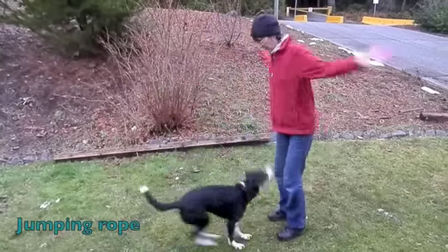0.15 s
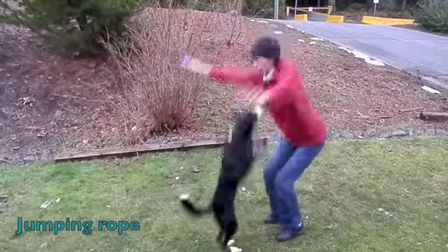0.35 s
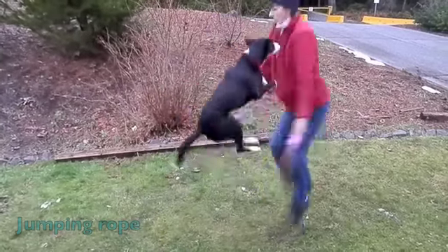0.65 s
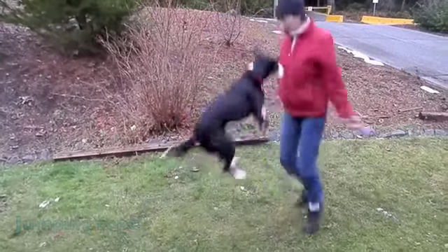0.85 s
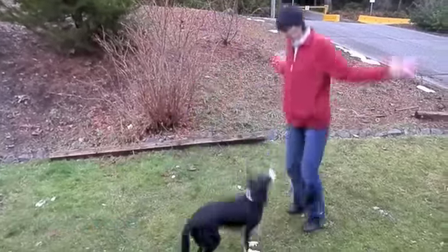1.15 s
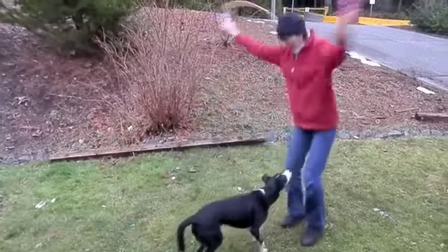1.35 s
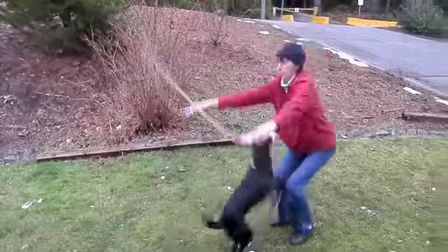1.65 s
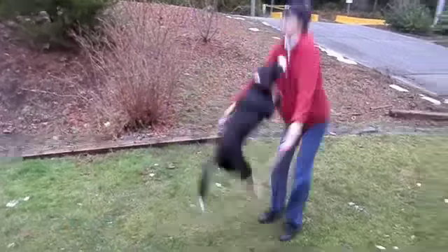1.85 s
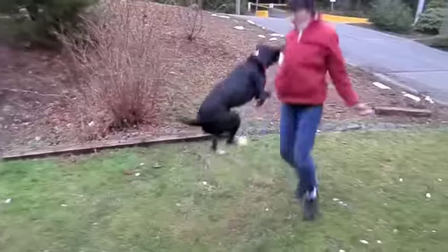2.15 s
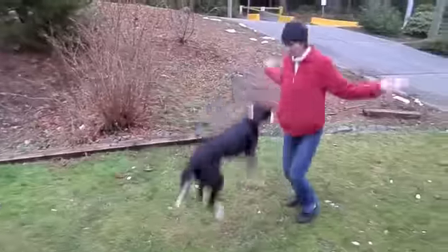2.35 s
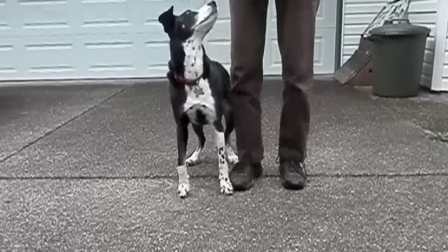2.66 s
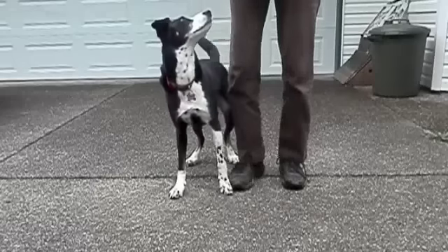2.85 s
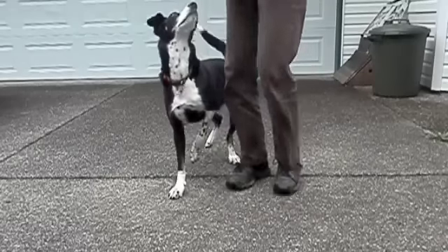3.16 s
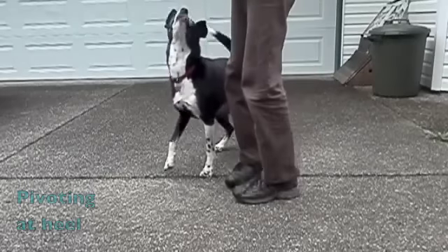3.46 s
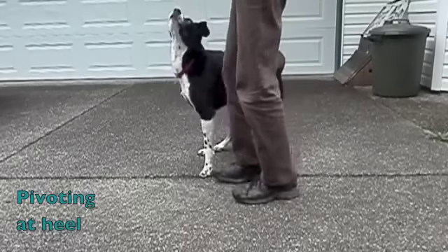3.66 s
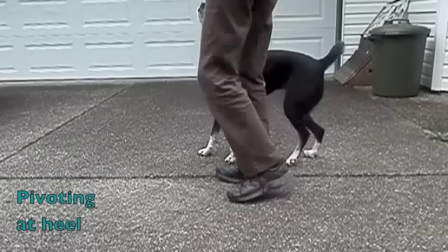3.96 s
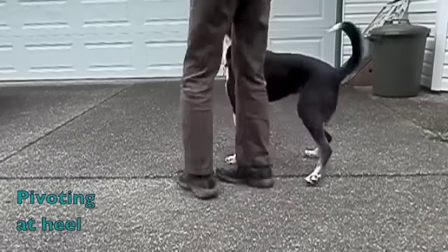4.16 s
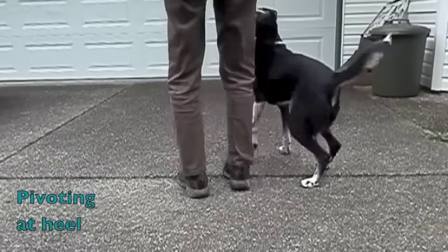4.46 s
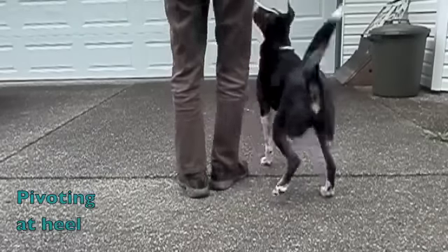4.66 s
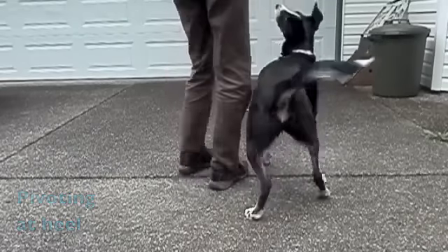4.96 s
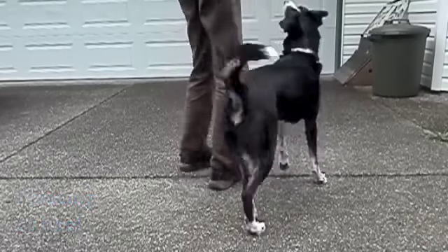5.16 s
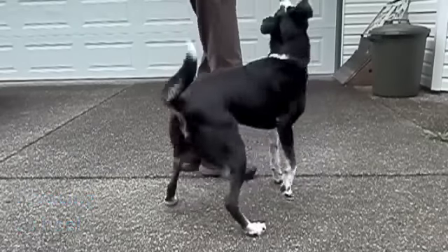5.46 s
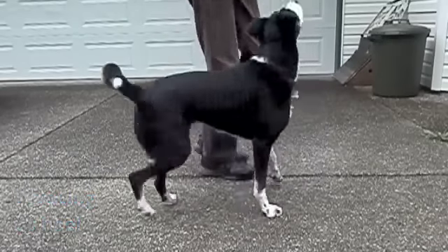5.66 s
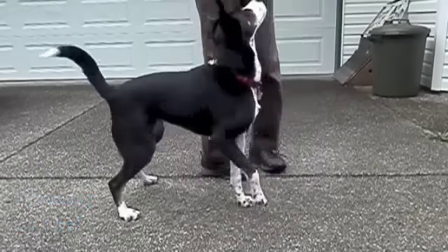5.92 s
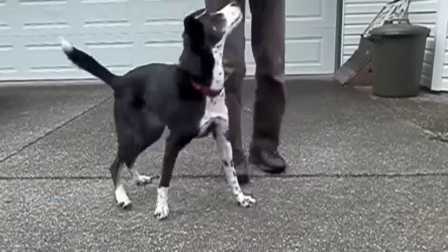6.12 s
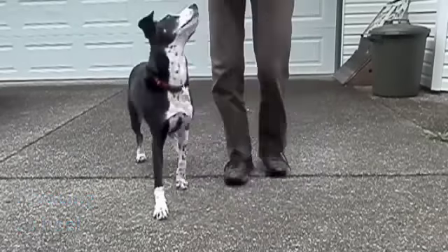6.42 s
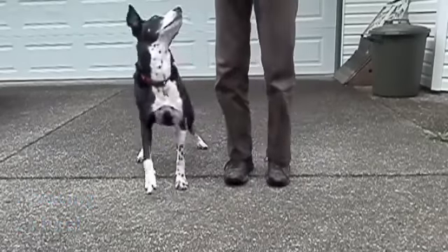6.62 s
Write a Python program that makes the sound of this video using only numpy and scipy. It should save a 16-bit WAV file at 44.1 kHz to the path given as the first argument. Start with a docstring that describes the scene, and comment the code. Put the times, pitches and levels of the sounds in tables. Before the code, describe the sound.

From 0 to 2.5 seconds, a lawn with a low, wavering rumble of distant traffic and faint hiss. A tiny tag jingle and jacket rustle open it; sound vanishes from about 0.3 to 0.6. Then rope ticks and slaps at 0.65-0.75, soft deep thuds of landings at 0.65-1.15, and a tinkle near 1.03. A bright jingle comes at 1.7, another silence at 1.75-1.95, then more ticks and the heaviest thuds near 2.2. It fades out by 2.57 into a concrete drive. Claws click lightly at 2.8, sharply at 3.3, 4.2, 4.9, 5.2, 5.5, 5.8, 6.1, 6.4 and 6.72, each with a short clattery echo off a garage door. Between them dull shoe knocks, gritty scrapes and fine paw rubbing. Low wind buffets thump the microphone from 3.9, strongest around 4.2-5.5 and again towards the end near 6.8.

```python
"""A dog and its handler jump rope on a lawn: low drum-like thuds of landing, a rustling jacket of tiny snaps,
collar tags ringing as dying tones, and rope ticks and slaps over filtered-noise traffic. It is muted twice.
After a fade the dog steps round the handler on a concrete drive: claws click in short bursts and echo off a
garage door, shoes knock and grit scrapes in shaped noise, and wind buffets the microphone with low lumps."""
import sys
import numpy as np
from scipy import signal
from scipy.fft import rfft, irfft, next_fast_len
from scipy.io import wavfile
from scipy.ndimage import uniform_filter1d

SR = 44100
rng = np.random.default_rng(int(sys.argv[2]) if len(sys.argv) > 2 else 0)


def output_pcm(signal):
    """Save a mono or channel-first signal as 16-bit PCM at the path in sys.argv[1].

    Samples are clipped to [-1, 1] before scaling.
    """
    pcm = np.clip(np.atleast_2d(signal).T, -1, 1) * 32767
    wavfile.write(sys.argv[1], SR, np.round(pcm).astype(np.int16))


N = 299432

# tone colour of fine bright rubbing, in the jacket and under the paws: f/Hz, level/dB
FINE_RUB = [(2500, -27), (4000, -27.5), (5000, -12), (6000, -2), (8500, 5), (10500, -6.5), (13000, -10),
            (15700, -0.5), (16000, -48.5)]
# pads and soles drag on concrete: t/s, length/ms, pad level/dB, sole level/dB
DRAGS = [(2.66, 100, -81, -100), (2.691, 18, -85, -90), (2.897, 126, -80, -71), (2.962, 7, -80, -81),
         (3.078, 78, -77, -75), (3.092, 9, -81, -93), (3.159, 60, -81, -81), (3.211, 94, -82, -78),
         (3.0, 190, -94, -92), (3.305, 39, -84, -66), (3.43, 82, -92, -81), (5.205, 57, -76, -81),
         (3.248, 69.0, -78, -107), (3.358, 210, -76, -87), (3.492, 30, -91, -86),
         (3.561, 150, -80.5, -76.5), (3.614, 45, -74, -100), (3.694, 59, -80, -74.5), (3.761, 23, -81, -76),
         (3.872, 130, -74.5, -76), (3.929, 52, -89, -75), (3.962, 94, -67.5, -89), (4.215, 53, -78, -68),
         (4.291, 190, -80, -75.5), (4.44, 44, -93, -80), (4.66, 380, -95, -84), (4.36, 36, -89, -75),
         (4.425, 14, -77, -88), (4.52, 110, -76.5, -76), (4.561, 110, -79, -76), (4.769, 52, -75, -69),
         (4.895, 30, -76, -78), (5.023, 130, -82, -85), (5.114, 96, -69.5, -82), (5.155, 220, -73, -70.5),
         (5.3, 67, -85, -79), (5.361, 57, -77.5, -74), (5.43, 110, -84, -84), (5.6, 470, -86, -84),
         (5.672, 25, -82, -84), (5.701, 50, -68.5, -71), (5.781, 85, -75.5, -76), (5.9, 260, -78, -79.5),
         (6.068, 30, -77, -88), (6.181, 70, -78, -78.5), (6.286, 500, -80.5, -82), (6.528, 87, -74, -74),
         (6.578, 79, -78, -80), (6.782, 40, -74, -80)]


def amp(db):
    """Turns decibels into a gain."""
    return 10 ** (np.asarray(db) / 20)


def evened(x):
    """Scales a signal to an average strength (rms) of 1."""
    return x / np.sqrt(np.mean(x ** 2) + 1e-20)


def add(mix, s, sound):
    """Mixes a sound in, starting at s seconds."""
    part = mix[round(s * SR):][:len(sound)]
    part += sound[:len(part)]


def curve(rows):
    """Reads a table of t/s, value at every sample, with straight lines between the points."""
    return np.interp(np.arange(N) / SR, *np.transpose(rows))


def wander(seconds):
    """Makes a slow random curve of rms 1 by smoothing noise twice."""
    size = max(round(seconds * SR), 2)
    smooth = uniform_filter1d(rng.standard_normal(N), size)
    return evened(uniform_filter1d(smooth, size))


def coloured(x, shape):
    """Filters x to a tone colour given as f/Hz, level/dB points; the result has rms 1."""
    size = next_fast_len(N)
    hz, db = np.transpose(shape)
    log_hz = np.log(np.fft.rfftfreq(size, 1 / SR) + 1)
    gain = amp(np.interp(log_hz, np.log(hz + 1), db))
    return evened(irfft(rfft(x, size) * gain, size)[:N])


def ring(modes, seconds):
    """Adds dying sine tones, each given as f/Hz, level/dB, time to fall by 60 dB/s."""
    t = np.arange(round(seconds * SR)) / SR
    return sum(amp(db - 60 * t / t60) * np.sin(2 * np.pi * hz * t) for hz, db, t60 in modes)


def grains(shape, per_s, spread_db):
    """Makes the sound of rubbing: dense tiny snaps of uneven size over a little hiss."""
    hit = rng.random(N) < per_s / SR
    size = amp(spread_db * np.minimum(rng.exponential(1, N), 4)) * hit
    return coloured((evened(size) + 1.1) * rng.standard_normal(N), shape)


def swells(rows, rest_db):
    """Makes a level curve from t/s, length/ms, level/dB rows that swell and fade over a resting level."""
    rise, fall = 0.23, 0.38  # shares of the length: quicker in than out
    lead = SR // 8  # each swell begins this many samples before its time
    out = np.full(N, amp(rest_db))
    for s, ms, db in rows:
        u = np.arange(-lead, SR // 4) / SR / (ms / 1000)
        add(out, s, amp(db) * np.exp(-(u / np.where(u < 0, rise, fall)) ** 2))
    return np.append(out[lead:], np.full(lead, amp(rest_db)))  # shift back by the lead


def burst(modes):
    """Makes a few cycles of each broad f/Hz, width/Hz, level/dB band in a bell shape centred on sample 60."""
    t = np.arange(-60, 140) / SR
    return sum(amp(db) * np.exp(-(2 * width * t) ** 2) * np.sin(2 * np.pi * hz * t + 1)
               for hz, width, db in modes)


def clicks(rows, grit_db, grit_s, swell_in_db):
    """A click: faint noise swells briefly, a sharp peak, then clumpy noise dies fast, in three tone parts."""
    # sharp part: factor on the click's pitch, width/Hz, level/dB
    bright = [(0.718, 2500, -17), (1.03, 2560, 2), (1.3, 3000, -48)]
    # dull part: f/Hz, width/Hz, level/dB
    dull = [(2500, 2200, -12), (3830, 2370, -5.5)]
    # thin top, one row: f/Hz, width/Hz, level/dB
    top_hz, top_width, top_level_db = (13260, 2700, 4.5)
    crisp = 0.96  # share of the peak kept per dB of weakness
    width_spread_db = 1.1  # the sharp part differs in width from click to click
    dull_shift, dull_mix_db = 0.12, -0.5  # the dull part differs in pitch (share) and level

    out, t = np.zeros(N), np.arange(-300, 500) / SR
    swell_in = amp(swell_in_db) * np.exp(t / 0.0047) * (1 - t / t[0])
    fade = amp(grit_db) * np.exp(-abs(t) / grit_s)
    shape = np.where(t < 0, swell_in, fade)
    clumps = amp(3.7 * np.repeat(rng.standard_normal((len(rows), 40)), repeats=20, axis=1))
    pulses = rng.laplace(size=(len(rows), 800)) * clumps * shape
    # the sharp peak: weak clicks have more noise and less peak
    pulses[:, 300] = crisp ** (np.max(rows, 0)[1] - np.asarray(rows)[:, 1])
    pulses /= np.linalg.norm(pulses, axis=1, keepdims=True)

    odds = rng.standard_normal((len(rows), len(dull) + len(bright), 2))  # makes each click differ
    for (s, db, pitch, dull_db, top_db), pulse, odd in zip(rows, pulses, odds):
        modes = []
        for (factor, width, level), (a, _) in zip(bright, odd[len(dull):]):
            modes.append((factor * pitch, width * amp(width_spread_db * a), level))
        for (hz, width, level), (a, b) in zip(dull, odd):
            modes.append((hz * (1 + dull_shift * a), width, level + dull_db + dull_mix_db * b))
        modes.append((top_hz, top_width, top_level_db + top_db))
        # the peak lies 300 samples into the pulse, the burst's centre 60 further
        add(out, s - 360 / SR, amp(db) * np.convolve(pulse, burst(modes)))
    return out


def cracks(rows):
    """A handful of uneven snaps dies fast, heard through one broad resonance."""
    out, t = np.zeros(N), np.arange(3000) / SR
    sizes = amp(5.7 * rng.standard_normal((len(rows), 3000)))
    snaps = rng.standard_normal((len(rows), 3000)) * sizes
    for (s, db, hz, ms), snap in zip(rows, snaps):
        band = signal.butter(2, [hz * 0.78, hz * 1.19], "bandpass", fs=SR, output="sos")
        fade = amp(-60000 * t / ms) * (1 - np.exp(-t / 0.0003))
        crack = signal.sosfilt(band, snap * fade)
        add(out, s, amp(db) * crack / abs(crack).max())
    return out


def traffic():
    """Distant road rumble is fluttering filtered noise, with hums whose pitch and level waver."""
    # tone colour of the rumble: f/Hz, level per Hz/dB
    rumble = [(12, -53.5), (20, -6), (37, -20.5), (75, 0), (130, -6), (184, -11), (351, -12), (452, -17.5),
              (735, -16), (1280, -33.5), (1370, -32.5), (2440, -43.5), (3400, -57.5), (5000, -74.5),
              (6500, -99), (11000, -120)]
    # wavering hums: f/Hz, pitch waver/Hz, level/dB
    hums = [(81.4, 14.04, -44), (122.3, 5.15, -45.5)]
    waver_s, flutter_db = 0.0392, 2
    road = coloured(rng.standard_normal(N), rumble) * amp(-40 + 1.5 * wander(0.03))
    for hz, width, db in hums:
        turns = np.cumsum(hz + width * wander(waver_s)) / SR
        road += amp(db + flutter_db * wander(waver_s)) * evened(np.sin(2 * np.pi * turns))
    return road


def hiss(db):
    """Thin hiss of air and microphone is noise that drifts in patches of pitch and time."""
    # tone colour: f/Hz, level/dB
    thin_air = [(5000, -34), (7000, -17), (9000, -17), (11500, -30), (13300, 8), (14500, 13), (15800, 14),
                (16000, -47)]
    patch_db = 2.5  # depth of the patches
    z = signal.stft(coloured(rng.standard_normal(N), thin_air), nperseg=512)[2]
    patches = uniform_filter1d(rng.standard_normal(z.shape), size=8, axis=0)
    patches = evened(uniform_filter1d(patches, size=10, axis=1))
    return amp(db) * evened(signal.istft(z * amp(patch_db * patches), nperseg=512)[1][:N])


def thuds():
    """Turf gives like a soft drum under feet and paws: three short low modes and a puff of crushed grass."""
    # landings: t/s, level/dB, pitch f/Hz, base time to fall by 60 dB/s, grass level against the thud/dB
    landings = [(0.059, -43, 133.6, 0.062, -28), (0.651, -19, 160, 0.069, -31),
                (0.862, -19, 150, 0.025, -33), (0.883, -21.5, 162.3, 0.1, -26),
                (0.954, -20.5, 131, 0.043, -26), (1.115, -20.5, 308, 0.06, -26),
                (1.124, -25.5, 160.5, 0.14, -36), (1.1374, -19, 122, 0.043, -29),
                (1.577, -21, 148, 0.057, -36), (1.961, -22, 142, 0.075, -27.5),
                (2.18, -15, 164, 0.076, -43), (2.1835, -16, 147, 0.02, -33), (2.234, -32.5, 134, 0.19, -28),
                (2.465, -25.5, 172.5, 0.12, -24), (2.51, -25.5, 79, 0.18, -44)]
    out, t = np.zeros(N), np.arange(round(.15 * SR)) / SR
    for s, db, hz, t60, grass_db in landings:
        modes = [(hz, db, t60), (hz * 1.7, db - 12.0, t60 * 1.4), (hz * 2.64, db - 12.5, t60 * 0.67)]
        body = ring(modes, .15)
        soft_noise = signal.lfilter([.1], [1, -.9], rng.standard_normal(len(t)))
        puff = soft_noise * amp(db + grass_db - 40 * t / t60)
        add(out, s, (body + puff) * (1 - np.exp(-t / 0.0022)))
    return out


def tags():
    """Two thin metal tags ring at every touch in another mix of modes, wavering in pitch as they swing."""
    # ringing modes, three of the larger tag, three of the smaller, two at the top:
    # f/Hz, level/dB, time to fall by 60 dB/s before the touch's ring factor
    tag_modes = [(6230, 1.5, 0.11), (7080, 1.5, 0.033), (7960, 5, 0.13), (9225, 0, 0.16), (9300, -7, 0.12),
                 (11260, -23, 0.34), (14300, -18, .06), (15650, -18.5, .06)]
    # touches: t/s, level/dB, the larger tag's three modes against the smaller/dB (three columns),
    # top modes/dB, ring time factor (fur damps them), rise time/ms
    touches = [(.063, -55.5, -18, -15, -19.5, 15.5, 0.7, .7), (.792, -61, -15, -6, -25, 7, 5.4, 6),
               (.925, -71, -1, -20, -1, 0, 1, 5), (1.034, -45, -29.5, -34, -32, 9.5, 1.1, 2),
               (1.145, -65, -9.5, -25, -18, 0, 1.4, 3), (1.19, -64.5, -15, -2, -20, -2, 0.57, 0.91),
               (1.335, -66, -11, -1, -12, -8, 4.9, 16), (1.385, -70, -18.5, 9.5, 1.5, -4, 1.15, 3),
               (1.435, -81, -6, -14, 7.5, 2.5, 1.7, 5), (1.699, -39.5, -10.5, -14.5, -18.5, 16, 0.14, 0.6),
               (1.738, -60.5, -4, -6, -3.5, 19, .4, 2), (2.116, -73.5, 11, -12, 5, 7, 0.38, .7),
               (2.494, -61, -11, -45.5, -24, -8, 0.94, .7), (5.111, -59, -9, 6, -11, 0, 0.88, 1)]
    out, t = np.zeros(N), np.arange(round(.3 * SR)) / SR
    sway, flutter = wander(0.0089), wander(0.011)
    # every mode reads the random curves from its own place
    place = rng.integers(0, N - len(t), (len(touches), len(tag_modes)))
    for (s, db, *large_db, top_db, free, ms), starts in zip(touches, place):
        stopped = amp(db - 30 * np.minimum(t / 0.18, 2) ** 2.5)  # fur stops the ring
        caught = stopped * (1 - np.exp(-1000 * t / ms))
        mix = large_db + [0, 0, 0, top_db, top_db]
        for (hz, level, t60), mix_db, k in zip(tag_modes, mix, starts):
            here = slice(k, k + len(t))
            turns = np.cumsum(hz * (1 + 0.0039 * sway[here])) / SR
            fade = amp(level + mix_db - 60 * t / (t60 * free) + 2.2 * flutter[here])
            add(out, s, caught * fade * np.sin(2 * np.pi * turns))
    return out


def jacket():
    """Cloth rustles at each swing of the arms: fine bright snaps and a duller brush of the sleeves."""
    # swings: t/s, length/ms, level/dB
    swings = [(.064, 37, -79.5), (.11, 110, -82.5), (.3, 330, -75), (.68, 107, -69), (.679, 23, -63.5),
              (.704, 20, -78), (.724, 22, -75), (.88, 320, -74.5), (.99, 56, -84), (1.03, 320, -79),
              (1.152, 100, -73.5), (1.32, 70, -85), (1.47, 190, -80), (1.6, 32, -85), (1.706, 94, -66.5),
              (1.955, 74, -67), (2.027, 78, -71.5), (2.117, 63, -76), (2.06, 100, -86), (2.185, 87, -75),
              (2.258, 69, -79), (2.48, 140, -74.5)]
    # tone colour of the sleeves: f/Hz, level/dB
    sleeves = [(2000, -4.5), (3500, 4.5), (5500, -12.5), (7500, -17.5)]
    level = swells(swings, -87.0) * amp(0.71 * wander(0.014))
    cloth = grains(FINE_RUB, 1100, 3.2)
    brush = amp(-8) * grains(sleeves, 900, 3)
    return level * (cloth + brush)


def rope_slaps():
    """The rope slaps turf or cloth in short cracks of noise."""
    # slaps: t/s, level/dB, centre f/Hz, time to fall by 60 dB/ms
    slaps = [(.6484, -59, 2600, 25), (.704, -52, 3500, 14), (.7228, -52, 3780, 28), (.828, -69, 9000, 15),
             (1.006, -53, 2600, 16), (1.113, -47.5, 1490, 66), (1.12, -58, 2980, 40), (1.46, -63, 7200, 12),
             (1.527, -63.5, 7200, 15), (2.168, -62, 8600, 10), (2.2418, -57, 2700, 28),
             (2.259, -62, 10000, 22), (2.464, -68, 3000, 25)]
    return cracks(slaps)


def rope_ticks():
    """Rope and jacket tick in tiny bright clicks."""
    # ticks: t/s, level/dB, pitch f/Hz, dull part against the click/dB
    small_hits = [(.65, -58, 8700, -6), (.66, -66, 7700, -4), (.667, -62, 9500, -20),
                  (0.6775, -54, 6800, -12), (.681, -46, 9400, -8), (0.7228, -66, 7300, 4),
                  (0.7277, -48.5, 8400, -10), (0.9943, -42, 8800, -22), (1.113, -49.5, 9050, -12),
                  (1.1454, -55.5, 7600, -8), (1.956, -49, 9050, -16), (1.9784, -59, 8840, 2),
                  (2.024, -49, 8400, -5), (2.024, -46, 8550, -23), (2.029, -44.5, 8460, -7),
                  (2.1174, -62, 7000, -9), (2.192, -49.5, 8800, -22)]
    ticks = [(*row, -9.5) for row in small_hits]  # adds the thin top's level in dB
    return clicks(ticks, -19.0, 0.0027, -35)


def lawn():
    """Mixes the sounds of the lawn except the tags."""
    return traffic() + hiss(-81.0) + thuds() + jacket() + rope_slaps() + rope_ticks()


def far_traffic():
    """Far traffic at the drive is low filtered noise with a fluttering level."""
    # tone colour: f/Hz, level per Hz/dB
    rumble = [(12, -40), (20, -21.5), (118, -4.5), (278, -10), (367, -15), (520, -18.5), (750, -20.5),
              (960, -24), (1150, -33.5), (1890, -47), (2600, -57), (3500, -86), (5000, -81), (8000, -120)]
    return amp(-50.5 + 1.8 * wander(0.022)) * coloured(rng.standard_normal(N), rumble)


def wind():
    """Wind on the microphone is lumpy low noise, plus single pressure dips with a swell on either side."""
    # level of the lumpy noise: t/s, level/dB
    strength = [(2.7, -55.5), (3.7, -52.5), (3.9, -52.5), (4.2, -44.5), (4.5, -48), (4.8, -44), (5.07, -52),
                (5.25, -40.5), (5.5, -41.5), (5.75, -49), (5.95, -43), (6.15, -47), (6.35, -53), (6.5, -44),
                (6.65, -47), (6.79, -36.5)]
    # tone colour: f/Hz, level per Hz/dB
    low_noise = [(8, 1.5), (25, 1), (60, 0.5), (120, -9), (250, -31), (500, -75.5)]
    # strongest buffets: t/s, peak level/dB, width/ms
    buffets = [(3.892, -29, 4.2), (3.919, -34.5, 5.8), (4.211, -27.5, 6.5), (4.237, -32, 3.34),
               (4.271, -32, 5.3), (4.451, -28.5, 6.8), (4.499, -37.5, 10), (4.642, -28.5, 7.6),
               (4.732, -33, 6.9), (4.837, -27, 6.3), (4.876, -35.5, 5.3), (4.89, -33.5, 6.2),
               (4.957, -34.5, 4.7), (4.984, -33, 6.3), (5.009, -29, 4.3), (5.083, -34, 13),
               (5.109, -28, 4.7), (5.159, -30.5, 5.2), (5.177, -34, 4.9), (5.299, -25.5, 3.06),
               (5.377, -36, 3.5), (5.447, -31.5, 6.6), (5.464, -45, 2.6), (5.541, -27, 4.4),
               (5.603, -36.5, 19), (5.926, -31.5, 7.6), (5.963, -62, 20), (6.561, -32.5, 8.7),
               (6.652, -34.5, 3.6), (6.721, -24.5, 7), (6.784, -36, 7.7)]
    lumpy = coloured(rng.standard_normal(N) * amp(2.1 * wander(0.039)), low_noise)
    out = amp(curve(strength)) * lumpy
    for s, db, ms in buffets:
        u = np.arange(-2200, 2200) / SR / (ms / 1000) * 1.2
        add(out, s - 2200 / SR, amp(db) * (u ** 2 - 1) * np.exp(-u ** 2 / 2))
    return out


def scuffs():
    """Each drag swells and fades: fine bright grit under the pads, coarser dull grit under the soles."""
    # tone colour of the soles: f/Hz, level/dB
    sole_rub = [(700, 5), (1500, -4), (2500, -1), (4000, -4.5), (6000, -22)]
    pads = swells([(s, ms, db) for s, ms, db, _ in DRAGS], -106)
    soles = swells([(s, ms, db) for s, ms, _, db in DRAGS], -97)
    flutter = amp(2.2 * wander(0.0099))
    return flutter * (pads * grains(FINE_RUB, 2200, 2.8) + soles * grains(sole_rub, 700, 3.5))


def snags(s, ms, db, dull_db):
    """A claw catches twice in each drag, as it starts and anywhere along it; gives rows for clicks."""
    s, ms, db, dull_db = (np.repeat(c, repeats=2) for c in (s, ms, db, dull_db))
    when = rng.random(len(s))
    when[::2] = 0
    size, tone = rng.standard_normal((len(s), 2)).T
    start = s + 0.74 * when * ms / 1000
    level = db + 8 + 4 * size  # dB, usually louder than the drag
    pitch = 7600 * (1 + 0.056 * tone)  # Hz
    return np.transpose([start, level, pitch, dull_db, np.full(len(s), -27)])  # thin top at -27 dB


def claws():
    """Claws click on concrete, with small ticks in the drags, duller where the sole drags harder."""
    # clear clicks, with a few bumps of their echo:
    # t/s, level/dB, pitch f/Hz, dull part against the click/dB, thin top against the click/dB
    clear_clicks = [(2.6636, -59, 7850, -12, -31), (2.691, -50.5, 7900, -6, -26),
                    (2.788, -43, 7650, -8, -6), (2.796, -41, 7900, -7, -15), (2.826, -61, 7000, 7, -25),
                    (2.893, -61, 8600, -10, -25), (2.9034, -71, 6020, 24, -22),
                    (3.2093, -46, 7460, -28, -33), (3.227, -54, 7950, -25, -23),
                    (3.2517, -54, 7900, -30, -27), (3.2967, -33.5, 7300, -4.5, -15),
                    (3.3035, -53, 7700, -6, -19), (3.367, -56, 8060, -22, -23), (3.426, -62, 8240, -8, -25),
                    (3.493, -61, 8550, -13, -25), (3.5986, -48, 6560, -38, -14),
                    (3.6105, -49.5, 6150, -27, -25), (3.627, -65, 8450, -20, -25),
                    (3.693, -59, 7900, 1, -22), (3.712, -50, 7900, -4, -35), (3.761, -63, 8550, -25, -25),
                    (3.857, -57, 7300, -20, -25), (3.892, -67, 8500, -6, -22),
                    (3.9518, -41, 7040, -4.5, -25), (3.959, -45, 7200, -17, -24),
                    (3.963, -45, 7600, -21, -22), (4.0039, -53, 7600, -30, -22),
                    (4.018, -67, 8100, -22, -25), (4.2139, -34.5, 6900, -10.5, -13),
                    (4.2255, -41.5, 8200, -13, -8), (4.227, -56, 7060, -17, -15),
                    (4.2341, -47, 7500, -15, -29), (4.557, -50.5, 7800, 6, -22),
                    (4.5612, -54, 8100, -20, -23), (4.5925, -41, 7200, -12, -16),
                    (4.9123, -30, 7900, -5, -16), (4.9146, -34.5, 7600, -4, -15),
                    (5.1905, -61, 6200, 22.5, -17), (5.1991, -34.5, 7460, -1, -14),
                    (5.2128, -46, 6600, -19, -25), (5.219, -43, 7600, -25, -21),
                    (5.222, -43, 7900, -7, -23), (5.2834, -46.5, 8000, -21, -11),
                    (5.462, -55, 8200, -17, -30), (5.473, -62, 7500, -15, -30),
                    (5.489, -37, 7660, -7.5, -15), (5.4908, -33.5, 7500, -3.5, -16),
                    (5.5595, -49, 8100, -4, -18), (5.7022, -51.5, 8350, -7, -2),
                    (5.7936, -45.5, 6400, 4.5, -12), (5.878, -64, 7500, -20, -25),
                    (5.8045, -38.5, 7960, -6.5, -14), (6.0872, -35.5, 7350, -6, -16),
                    (6.09, -54, 7400, -18, -17), (6.4142, -31, 7450, -8, -24), (6.4148, -51, 7000, -30, -3),
                    (6.429, -44, 7400, -23, -6), (6.721, -41, 7650, -9, -16), (6.7221, -32.5, 7800, -7, -6),
                    (6.725, -31, 7700, -16, -13), (6.7255, -52, 7900, -34, -10),
                    (6.7296, -41, 8100, -7, -9), (6.7655, -56, 7600, 11, -19)]
    s, ms, pads_db, soles_db = np.transpose(DRAGS)
    dull_db = np.clip(0.67 * (soles_db - pads_db) - 17.0, -25, 8)
    small = snags(s, ms, np.minimum(pads_db, -76), dull_db)
    return clicks(np.vstack([clear_clicks, small]), -25.5, 0.002, -40.0)


def door(x):
    """A ribbed door and wall scatter a late, swelling, quickly gone echo that changes as the dog moves."""
    # tone colour of the echo: f/Hz, level/dB
    door_tone = [(1200, 10), (2500, 5.5), (4500, 2.5), (6000, 7), (8000, 1), (10500, 9), (14000, 2),
                 (16500, 3)]
    late = np.maximum(np.arange(N) / SR - .007, 0)  # seconds since the first echo
    swell = (1 - 0.53 * np.exp(-(late / 0.011) ** 2)) * (1 - np.exp(-late / 0.0017))
    main_tail = amp(-60 * np.minimum(late / 0.073, 4))
    yard_tail = amp(-19.5 - 60 * np.minimum(late / 0.25, 4))  # fainter, longer tail from the yard
    shape = swell * (main_tail + yard_tail)
    # five random echoes take turns, 6000 samples each
    place, out = (np.arange(N) // 6000) % 5, np.zeros(N)
    for k in range(5):
        clumps = amp(1.6 * rng.standard_normal(N) + 2.8 * wander(0.00066))
        taps = coloured(rng.standard_normal(N) * clumps, door_tone) * shape
        out += signal.oaconvolve(x * (place == k), taps[:SR // 4] / np.linalg.norm(taps))[:N]
    return out


def grit_cracks():
    """Grit cracks under a sole or pad in short bursts of snaps."""
    # cracks: t/s, level/dB, centre f/Hz, time to fall by 60 dB/ms
    crunches = [(2.896, -53.5, 2620, 14), (2.9601, -73, 1290, 20), (2.962, -62, 3300, 14),
                (3.078, -67, 2600, 60), (3.1582, -63, 1490, 18), (3.159, -66, 4030, 13),
                (3.312, -54, 1980, 40), (3.324, -51.5, 1410, 47), (3.328, -55, 3000, 37),
                (3.4256, -59, 1270, 19), (3.427, -63.5, 4200, 21), (3.56, -67, 3830, 22),
                (3.6925, -79, 2500, 19), (3.762, -78, 3500, 22), (3.825, -67, 3570, 20),
                (3.892, -70, 3000, 20), (3.8381, -67, 1800, 16), (3.855, -73, 2600, 20),
                (4.2951, -79, 4000, 20), (4.3545, -49.5, 1840, 9.4), (4.4268, -64, 4400, 15),
                (4.5555, -62, 3270, 20), (4.7625, -59, 3660, 20), (4.79, -68, 3000, 20),
                (4.824, -71, 3950, 54), (5.026, -65, 3080, 18), (5.117, -63, 2700, 30),
                (5.138, -62, 2600, 30), (5.1606, -57, 1700, 30), (5.177, -63, 3500, 15),
                (5.292, -64, 4000, 15), (5.3617, -68, 3500, 27), (5.675, -66, 3000, 20),
                (5.7717, -65, 2800, 20), (5.9927, -53, 1200, 25), (6.0047, -55, 2120, 14),
                (6.012, -63, 1150, 70), (6.098, -67, 3600, 20), (6.183, -63.5, 2400, 26),
                (6.2556, -76, 2000, 20), (6.434, -60, 2300, 30), (6.5215, -57, 3650, 67)]
    return cracks(crunches)


def shoes():
    """Shoes on concrete have no clear ring: broad noise rises as the sole rolls down, then dies fast."""
    # steps: t/s, peak level/dB, centre f/Hz, time to fall by 60 dB/s
    steps = [(2.959, -33.5, 604, 0.04), (3.089, -43, 574, 0.035), (3.299, -35.5, 358, 0.49),
             (3.423, -47, 400, 0.19), (3.838, -39.5, 350, 0.097), (4.213, -33.5, 308, 0.11),
             (4.296, -37, 654, 0.0092), (4.232, -41, 497, 0.041), (4.353, -42, 654, 0.11),
             (4.426, -39, 437, 0.052), (4.558, -33, 453, 0.063), (4.763, -36.5, 557, 0.034),
             (5.197, -45, 600, 0.074), (5.223, -44, 460, 0.054), (5.04, -35.5, 296, 0.026),
             (5.097, -37.5, 456, 0.062), (5.161, -38.5, 340, 0.2), (5.363, -36.5, 291, 0.081),
             (5.458, -43, 312, 0.096), (5.862, -34, 283, 0.025), (5.983, -39, 294, 0.43),
             (6.003, -38.5, 513, 0.19), (6.52, -37.5, 425, 0.04), (6.526, -32, 398, 0.082)]
    roll_s = 0.001
    out, t = np.zeros(N), np.arange(round(.15 * SR)) / SR
    for s, db, hz, t60 in steps:
        band = signal.butter(1, [hz * 0.48, hz * 1.57], "bandpass", fs=SR, output="sos")
        push = 4.0 * np.exp(-t * hz * 6)
        blow = rng.standard_normal(len(t)) * amp(-60 * t / t60) + push
        knock = signal.sosfilt(np.vstack([band, band]), blow) * (1 - np.exp(-t / roll_s))
        add(out, s, amp(db) * knock / abs(knock).max())
    return out


def drive():
    """Mixes the sounds of the drive except the tags, with an echo of the claws."""
    # echo against the click as the dog circles: t/s, level/dB
    echo_level = [(2.8, -5), (3.3, -7), (3.95, -4.5), (4.21, -6), (4.91, -9.5), (5.8, -7), (6.72, -7)]
    nails = claws()
    echo = door(nails * amp(curve(echo_level)))
    return far_traffic() + hiss(-82.5) + wind() + scuffs() + nails + echo + grit_cracks() + shoes()


def scene():
    """Fades from the lawn to the drive; the tags sound in both."""
    # turning points of the lawn's fades, in turn full, silent, silent, full: t/s
    lawn_times = [0.301, 0.341, 0.569, 0.596, 1.736, 1.776, 1.938, 1.964, 2.488, 2.572]
    # start and end of the drive's fade in: t/s
    drive_times = [2.551, 2.658]
    t, jingle = np.arange(N) / SR, tags()
    first = np.interp(t, lawn_times, np.resize([1, 0, 0, 1], len(lawn_times)))
    second = np.interp(t, drive_times, [0, 1])
    mix = first ** 1.18 * (lawn() + jingle) + second ** 2.0 * (drive() + jingle)
    return mix[None]


def record(dry):
    """Cuts the treble steeply around 16400 Hz with a low-pass filter."""
    lowpass = signal.firwin(511, 16400, window=("kaiser", 9), fs=SR)
    return signal.oaconvolve(dry, lowpass[None], "same")


dry = scene()
out = record(dry)
output_pcm(out)
```